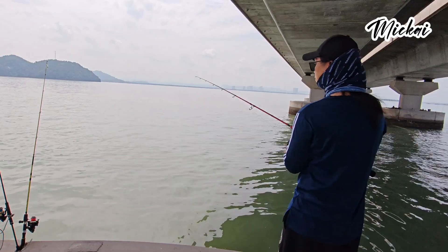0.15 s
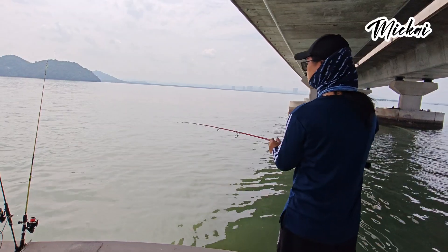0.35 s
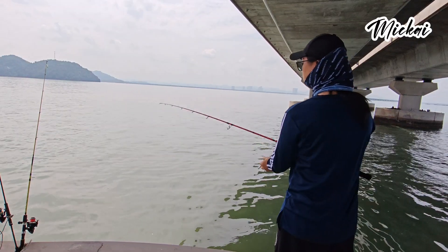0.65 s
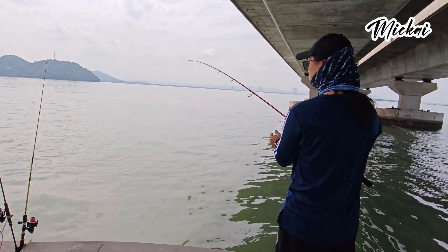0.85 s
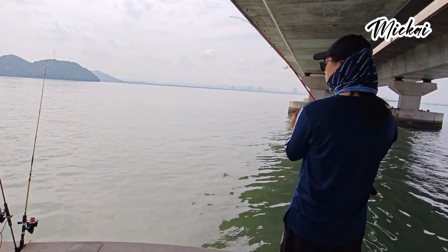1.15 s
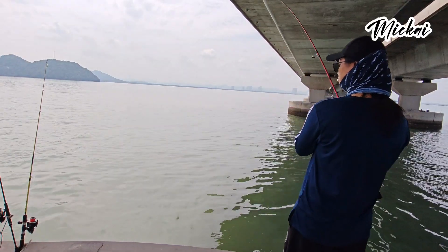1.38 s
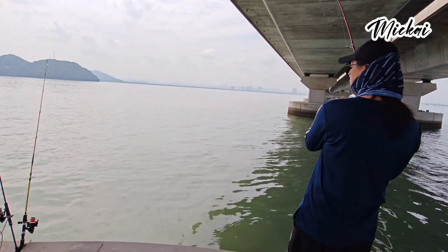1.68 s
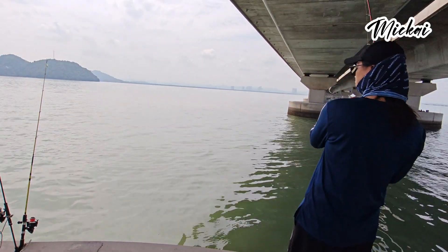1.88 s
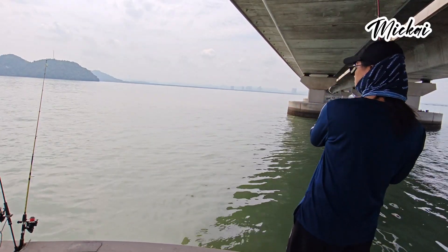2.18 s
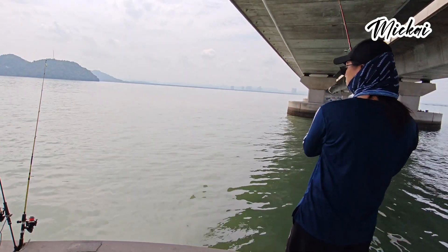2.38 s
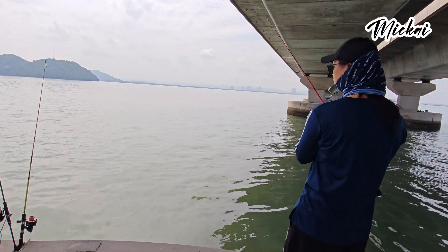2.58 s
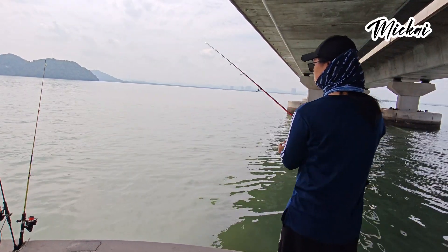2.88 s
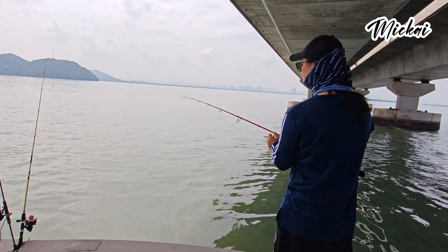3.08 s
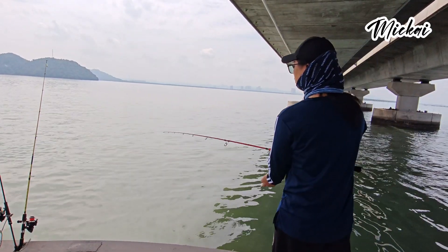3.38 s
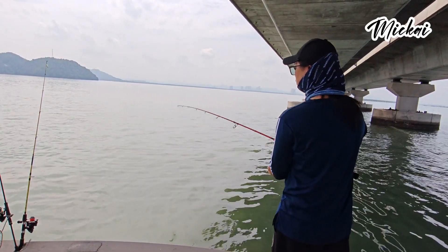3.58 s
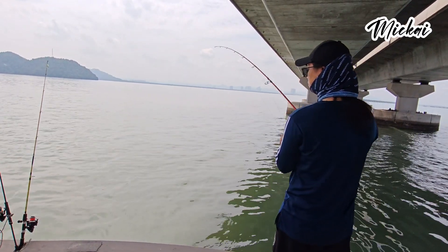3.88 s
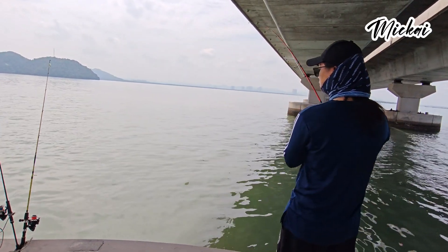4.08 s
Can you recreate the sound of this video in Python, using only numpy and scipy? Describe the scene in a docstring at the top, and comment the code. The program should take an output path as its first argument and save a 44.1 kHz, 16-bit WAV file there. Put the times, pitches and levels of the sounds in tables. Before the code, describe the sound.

Under a road bridge, low booming vehicle passes swell overhead as water hisses nearby, a reel is briefly cranked and tackle clicks.

```python
"""Traffic on a concrete road bridge over the sea, heard from below: noise bands shaken by axle loads, tyre roar
and tread noise swelling with each pass, sinking engine tones and briefly singing treads. Nearer: a fine high
hiss swells and fades, droplets ring, and an angler cranks a spinning reel in short spells (line, gear and rotor
noise); tackle clicks, faint squeaks and a steady hiss complete it."""
import sys
import numpy as np
from scipy import signal
from scipy.fft import rfft, irfft, next_fast_len
from scipy.io import wavfile
from scipy.ndimage import uniform_filter1d, map_coordinates

SR = 44100
rng = np.random.default_rng(int(sys.argv[2]) if len(sys.argv) > 2 else 0)


def to_wav(s):
    """Save 16-bit WAV."""
    ch = np.atleast_2d(s).T  # columns
    pcm = np.round(np.clip(ch, -1, 1) * 32767)  # PCM
    wavfile.write(sys.argv[1], SR, pcm.astype(np.int16))


N = 187204
TIME_S = np.arange(N) / SR

# Levels in the tables are ahead of filters and mix gains.
# Noise spectra: [f/Hz, relative level/dB]
# span, slab and hollow girder
SHUDDER_SPECTRUM = [(16, -33), (25, -15), (40, -8.5), (60, -3.5), (74, -2.5), (90, -21.5)]
RUMBLE_SPECTRUM = [(62, -22), (80, -11), (91, 11.5), (99, -6.5), (112, 6), (135, -6.5), (165, -28)]
BOOM_SPECTRUM = [(110, -20), (142, -1), (175, -1), (230, -2), (300, -6.5), (400, -22.5)]
# tyres: broad road roar, tread hump, bright edge: [f/Hz, relative level/dB]
ROAR_SPECTRUM = [(250, -23.5), (335, 2.5), (430, -1.5), (560, -4), (700, -4), (900, -15.5)]
TREAD_SPECTRUM = [(520, -17), (730, -8), (860, -1.5), (1080, 0), (1220, -0.5), (1400, -7.5), (1900, -22.5),
                  (2600, -23), (3400, -32.5), (5000, -37.5), (8000, -60)]
SIZZLE_SPECTRUM = [(1150, -22.5), (1400, 6), (1750, 2), (2200, -3), (2900, -10.5), (4000, -17.5)]
# swelling hiss at the left and right ports: [f/Hz, relative level/dB]
HISS_LEFT_SPECTRUM = [(1500, -9), (2500, 16.5), (3600, 3.5), (5200, -0.5), (6100, 7), (7100, 0),
                      (8000, 6.5), (8600, -1), (9300, -26.5), (11500, -29), (15500, -27.5)]
HISS_RIGHT_SPECTRUM = [(1500, -25), (2500, 14), (3600, -1), (5200, -5.5), (6100, 1), (7100, -9),
                       (8000, -31.5), (8600, -17), (9300, -39.5), (11500, -29), (15500, -42.5)]
# reel: line on roller, gears, rotor: [f/Hz, relative level/dB]
WHIRR_SPECTRUM = [(2500, -13), (5000, -1.5), (8000, 8), (9500, -2.5), (11200, -2), (11750, 2), (12400, -6),
                  (14000, -7.5), (15700, -10.5)]
GEAR_SPECTRUM = [(1900, -20), (2300, -3.0), (2650, 0.5), (2950, -1.5), (3400, -17.5), (4000, -34.5)]
ROTOR_SPECTRUM = [(4100, -12.5), (4600, -4), (4900, -7), (5200, -12.5), (5600, -15.0)]
# steady background hiss: [f/Hz, relative level/dB]
AIR_SPECTRUM = [(2000, 0), (9000, -1), (11500, 0.91), (16000, 0)]
# left-right likeness of the noises: [f/Hz, likeness/1]
PORT_LIKENESS = [(30, 0.89), (120, 0.99), (280, 0.98), (600, 0.95), (1000, 0.41), (2000, 0.23),
                 (4000, 0.13), (12000, 0.19)]

# shuddering of the span under heavy vehicles: [t/s, length/s, level/dB]
SPAN_SHAKES = [(.38, .03, -22), (0.635, 0.14, -15.5), (1.014, 0.022, -14.5), (1.62, .13, -18),
               (2.852, 0.097, -21), (3.315, .52, -18), (4.007, .11, -18)]
# axle thuds on the slab: [t/s, level/dB]
AXLE_THUDS = [(.09, -17), (.21, -24), (.71, -17), (1.06, -21), (1.18, -16), (1.3, -12), (1.46, -11),
              (1.63, -17), (1.747, -10.5), (2.05, -17.5), (2.28, -16), (2.41, -15.5), (2.72, -11),
              (2.88, -10.5), (3.07, -14), (3.25, -11), (3.52, -13), (3.9, -11), (4.11, -12)]
# girder boom under the traffic's weight: [t/s, level/dB]
GIRDER_LOAD = [(0.0, -26), (0.61, -19.5), (0.75, -15.5), (0.81, -23), (1.12, -18), (1.36, -22), (1.4, -16),
               (1.95, -18), (2.27, -15.5), (2.3, -23.5), (2.4, -17), (3.06, -18), (3.08, -23),
               (3.53, -14.5), (3.58, -25.5), (4.12, -19.5), (4.24, -23)]
# passes overhead: [t nearest/s, half-width/s, roar/dB, tread/dB, sizzle/dB]
PASSES = [(.72, 0.17, -23.5, -21, -37), (1.2, 0.61, -27.5, -25.5, -27), (2.15, 0.35, -29.5, -25.5, -32),
          (2.6, 0.2, -24.5, -20.5, -25), (3.03, 0.14, -23.5, -19, -28.5), (3.48, 0.36, -21.5, -17, -47.5)]
# nominal tread hump pitch: [t/s, f/Hz]
TREAD_PITCH_CURVE = [(0, 931), (.6, 863.4), (1.05, 1048), (2.2, 1065), (3.1, 1039), (3.85, 903.5),
                     (4.24, 965)]
# traffic's lead at the left microphone: [t/s, lead/s]
LEFT_LEAD = [(0, 0.00018), (.75, 0.00032), (1.5, 0.00016), (2.25, 0.00013), (3.25, 0.00025),
             (4.24, 0.00032)]
# engines, singing treads, thin squeaks: [t/s, length/s, f/Hz, sag/(Hz/s), level/dB]
ENGINE_TONES = [(2.01, .26, 182, 62, -17.5), (2.438, 0.21, 136.5, 32, -22), (2.716, 0.32, 109, 11, -20.5),
                (3.23, 0.97, 312, 28, -30.5)]
TREAD_TONES = [(1.87, 0.056, 1088, 201.3, -22), (2.22, .035, 1108, 100, -24.5)]
SQUEAK_TONES = [(.026, .02, 7300, 600, -60), (.068, .018, 7400, 600, -59)]
# hiss surges: [t/s, length/s, hiss/dB, rise/(dB/s), fall/(dB/s)]
HISS_SURGES = [(.02, 0.063, -53, 100, 130), (.56, 0.3, -33, 125, 28), (3.12, 0.57, -37, 13, 52),
               (4.12, 0.057, -44, 67, 43)]
# cranking spells: [t/s, length/s, whirr/dB, gears/dB, rotor/dB, throb/dB,
#                   slowing/(dB/s), growing pull/(dB/s)]
CRANK_SPELLS = [(0.565, 0.34, -38.5, -42.5, -55.5, 4, 25, 44), (2.53, 0.61, -63, -51, -58, -0.5, -11, 10),
                (3.117, 0.12, -45, -35.5, -44, 1.0, -20, 30), (3.305, 0.15, -45, -32, -39.5, 2, 20, 5),
                (3.57, .2, -50.5, -43, -49.5, 2.5, 16, 26)]
# tackle clicks: [t/s, level/dB, ring f/Hz]
TACKLE_CLICKS = [(3.128, -25, 5400), (3.209, -23, 6200), (4.082, -18, 5860), (4.0868, -18.5, 4140)]
# reflections off close surfaces: [delay/s, gain/1]
CLOSE_ECHOES = [(.00057, .17), (.0021, .14), (.0053, .16), (0.012, .16)]

SPAN_DB, SHAKE_RISE_DB_PER_S, SHAKE_FALL_DB_PER_S = -24.5, 221, 261
SLAB_DB, THUD_RISE_DB_PER_S, THUD_FALL_DB_PER_S = -22, 172.5, 256
THUD_IN_GIRDER_DB = -10   # share of each thud picked up by the girder
FAR_ROAR_DB, FAR_TREAD_DB, FAR_SIZZLE_DB = -35, -32, -44   # traffic further along the bridge
SHIELDING = 1.26   # exponent: deck edge makes a pass fade faster than distance alone
TREAD_HZ = 1037   # reference pitch for the hump's slide
CALM_HISS_DB = -58.5
CRANK_START_DB_PER_S, CRANK_STOP_DB_PER_S = 552, 64
GEAR_START_DB_PER_S, GEAR_STOP_DB_PER_S = 149.5, 91.5
FIRST_TURN_S = 0.0087   # spell start to the first throb peak
CUTOFF_HZ = 15800


def from_db(db):
    """Decibels to amplitude gain."""
    return 10 ** (np.asarray(db) / 20)


def rms_one(x):
    """Scale to unit power."""
    return x / np.sqrt(np.mean(x ** 2) + 1e-20)


def in_time(rows):
    """Interpolate a two-column curve at every sample."""
    t_s, value = np.transpose(rows)
    return np.interp(TIME_S, t_s, value)


def at_hz(points, hz):
    """Interpolate a table on a log-frequency axis."""
    table_hz, value = np.transpose(points)
    return np.interp(np.log(hz), np.log(table_hz), value)


def drift(corner_hz):
    """Slow random modulation of unit RMS: white noise through two equal poles."""
    step = 40   # samples per slow sample
    pole = np.exp(-2 * np.pi * corner_hz * step / SR)
    white = rng.standard_normal(N // step + 2002)
    slow = signal.lfilter([1], [1, -2 * pole, pole * pole], white)[2000:]   # drop settling
    return np.interp(np.arange(N) / step, np.arange(len(slow)), rms_one(slow))


def noise(spectrum, right_spectrum=None):
    """Coloured noise at two ports, alike in the bass and largely unrelated in the treble."""
    size = next_fast_len(N, True)
    hz = np.maximum(np.fft.rfftfreq(size, 1 / SR), 1)
    mid, side = rfft(rng.standard_normal((2, size)))
    alike = np.clip(at_hz(PORT_LIKENESS, hz), 0, 1)
    pair = np.sqrt(1 + alike) * mid + np.sqrt(1 - alike) * side * [[1], [-1]]
    low_hz, high_hz = spectrum[0][0], spectrum[-1][0]
    skirts = np.minimum(1, np.minimum(hz / low_hz, high_hz / hz)) ** 4
    colour = from_db([at_hz(spectrum, hz), at_hz(right_spectrum or spectrum, hz)])
    return rms_one(irfft(pair * colour * skirts, size)[:, :N])


def steady(x, span_s):
    """Divide out the short-term RMS so a separate envelope sets the level."""
    power = uniform_filter1d(np.mean(x ** 2, axis=0), max(int(span_s * SR), 2))
    return x / np.sqrt(power + 1e-9)


def pan(db):
    """Port gains; positive dB favours the left."""
    return from_db([[db / 2], [-db / 2]])


def envelope(start_s, length_s, rise_db_per_s, fall_db_per_s):
    """Attack, hold and release in dB relative to the held level."""
    early_s = np.maximum(start_s - TIME_S, 0)
    late_s = np.maximum(TIME_S - start_s - length_s, 0)
    return -abs(rise_db_per_s) * early_s - abs(fall_db_per_s) * late_s


def together(levels_db):
    """Level of unrelated sounds heard at once: powers add."""
    return 10 * np.log10(sum(from_db(db) ** 2 for db in levels_db) + 1e-20)


def tones(rows, edge_db_per_s, waver, flutter_db, drift_hz):
    """Wavering sines that swell, hold and fade while their pitch sinks."""
    out = 0
    for start_s, length_s, start_hz, sag_hz_per_s, level_db in rows:
        pitch_hz = start_hz - sag_hz_per_s * (TIME_S - start_s)
        phase = 2 * np.pi * np.cumsum(pitch_hz * (1 + waver * drift(drift_hz))) / SR
        swell_db = envelope(start_s, length_s, edge_db_per_s, edge_db_per_s)
        gain = from_db(level_db + swell_db + flutter_db * drift(drift_hz))
        out = out + np.sqrt(2) * np.sin(phase) * gain
    return out


def air():
    """Faint steady hiss: stationary broadband noise."""
    return from_db(-71.5) * noise(AIR_SPECTRUM)


def squeaks():
    """Faint thin squeaks: short high sines with falling pitch."""
    return from_db(0.5) * tones(SQUEAK_TONES, edge_db_per_s=500, waver=0.0029, flutter_db=6.0, drift_hz=60)


def droplets(per_s=90, smallest_db=-62.0, spread_db=4.5, ring_s=0.003):
    """Tiny bubbles burst at random times, each exciting a short high damped resonance."""
    out = np.zeros((2, N))
    pitches_hz = np.geomspace(5200, 8300, num=12)
    r = np.exp(-1 / (ring_s * SR))
    for hz in pitches_hz:
        born = rng.random(N) < per_s / len(pitches_hz) / SR
        sizes = from_db(smallest_db + spread_db * np.minimum(rng.exponential(1, N), 3))
        w = 2 * np.pi * hz / SR
        rings = signal.lfilter([0, np.sin(w)], [1, -2 * r * np.cos(w), r * r], born * sizes + 1e-18)
        out += rings * pan(rng.normal(4, 3))
    return out


def swelling_hiss():
    """A fine hiss swells and fades in surges, brighter on the left side."""
    surges_db = [db + envelope(s, length_s, rise, fall) for s, length_s, db, rise, fall in HISS_SURGES]
    hiss_db = together([CALM_HISS_DB] + surges_db)
    return from_db(hiss_db + 3.5 + 0.5 * drift(40)) * noise(HISS_LEFT_SPECTRUM, HISS_RIGHT_SPECTRUM)


def tackle(ring_s=0.0011, crack_db=0.0, crack_s=0.002):
    """Clicks: a noise crack plus a damped ring; small parts radiate little bass."""
    out = np.zeros((2, N))
    age_s = np.arange(SR // 50) / SR
    for s, level_db, ring_hz in TACKLE_CLICKS:
        crack = rng.standard_normal((2, len(age_s))) * np.exp(-age_s / crack_s)
        ring = np.sin(2 * np.pi * ring_hz * age_s) * np.exp(-age_s / ring_s)
        start = int(s * SR)
        out[:, start:start + len(age_s)] += from_db(level_db) * (ring + from_db(crack_db) * crack)
    thin = signal.sosfilt(signal.butter(6, 3500, "high", fs=SR, output="sos"), out)
    return signal.sosfilt(signal.butter(4, 8500, fs=SR, output="sos"), thin)


def cranking(turns_hz=15.0, settle_s=0.33):
    """Whirr, gears, rotor in dB: throb dies as cranking evens out; gears rasp more as the line pulls."""
    spells = []
    for row in CRANK_SPELLS:
        s, length_s, whirr_db, gears_db, rotor_db, throb_db, slowing_db_per_s, pull_db_per_s = row
        age_s = TIME_S - s
        wound_s = np.clip(age_s, 0, length_s)
        settling = np.exp(-(age_s / settle_s) ** 2)
        throb = throb_db * np.cos(2 * np.pi * turns_hz * (age_s - FIRST_TURN_S)) * settling
        line = envelope(s, length_s, CRANK_START_DB_PER_S, CRANK_STOP_DB_PER_S) - slowing_db_per_s * wound_s
        drive = envelope(s, length_s, GEAR_START_DB_PER_S, GEAR_STOP_DB_PER_S) + pull_db_per_s * wound_s
        spells.append([whirr_db + line + throb, gears_db + drive, rotor_db + drive])
    return together(spells)


def winding(whirr_db, patchy_db, pan_db):
    """Line rubs over the roller: noise whose bands flicker separately as the line shifts."""
    rub, rest = 0, noise(WHIRR_SPECTRUM)
    for edge_hz in np.linspace(6000, 14000, num=6):
        band = signal.sosfiltfilt(signal.butter(6, edge_hz, fs=SR, output="sos"), rest)
        rest = rest - band
        rub = rub + band * from_db(patchy_db * drift(20))
    return from_db(whirr_db + 1.2 * drift(70)) * (rub + rest) * pan(pan_db)


def reel():
    """Spells of line whirr over gear rasp and rotor hiss, each a noise band."""
    whirr_db, gears_db, rotor_db = cranking()
    gears = from_db(gears_db + 0.88 * drift(27)) * noise(GEAR_SPECTRUM)
    rotor = from_db(rotor_db + 2.0 * drift(30)) * noise(ROTOR_SPECTRUM)
    return winding(whirr_db, patchy_db=3.0, pan_db=6.0) + (gears + rotor) * pan(db=4.0)


def reflected(x):
    """Close surfaces add delayed copies that ripple the spectrum."""
    return x + sum(gain * np.roll(x, int(delay_s * SR), axis=1) for delay_s, gain in CLOSE_ECHOES)


def engines():
    """Engines drone past: wavering low sines, sinking in pitch."""
    return tones(ENGINE_TONES, edge_db_per_s=156.5, waver=0.0295, flutter_db=3.0, drift_hz=16.7)


def singing_treads():
    """Treads sing briefly: short sines near 1.1 kHz, sinking in pitch."""
    return tones(TREAD_TONES, edge_db_per_s=168, waver=0.0075, flutter_db=4.5, drift_hz=28)


def passing():
    """Roar, tread and sizzle in dB: each vehicle swells as it nears and fades as it leaves."""
    levels_db = [np.array([[FAR_ROAR_DB], [FAR_TREAD_DB], [FAR_SIZZLE_DB]])]
    for s, width_s, *peaks_db in PASSES:
        distance = np.hypot(1, (TIME_S - s) / width_s)   # 1 when nearest
        levels_db.append(np.array(peaks_db)[:, None] - SHIELDING * 20 * np.log10(distance))
    return together(levels_db)


def sizzle(sizzle_db):
    """Bright edge of tyre noise, strongest from the nearest stretch of road."""
    return from_db(sizzle_db + 1.0 * drift(15)) * noise(SIZZLE_SPECTRUM)


def tyres(roar_db, tread_db):
    """Broad road roar plus a tread hump near 1 kHz, slid in pitch by variable-rate resampling."""
    doppler = np.clip(in_time(TREAD_PITCH_CURVE) / TREAD_HZ, 0.6, 1.5) ** 0.8   # softened slide
    place = np.cumsum(doppler)
    tread = np.array([map_coordinates(port, [place], order=3, mode="mirror")
                      for port in noise(TREAD_SPECTRUM)])
    return from_db(roar_db) * noise(ROAR_SPECTRUM) + from_db(tread_db + 3.0) * tread * pan(db=1.0)


def deck():
    """Axles shake the span, slab and hollow girder, each a noise band with its own load envelope."""
    shakes_db = [db + envelope(s, length_s, SHAKE_RISE_DB_PER_S, SHAKE_FALL_DB_PER_S)
                 for s, length_s, db in SPAN_SHAKES]
    thuds_db = [db + envelope(s, 0, THUD_RISE_DB_PER_S, THUD_FALL_DB_PER_S) for s, db in AXLE_THUDS]
    shudder_db = together(shakes_db + [SPAN_DB + 1.7 * drift(12)])
    rumble_db = together(thuds_db + [SLAB_DB + 1.1 * drift(5.1)])
    boom_db = together([in_time(GIRDER_LOAD), together(thuds_db) + THUD_IN_GIRDER_DB])
    span = from_db(shudder_db) * steady(noise(SHUDDER_SPECTRUM), span_s=0.14) * pan(db=1.5)
    slab = from_db(rumble_db) * steady(noise(RUMBLE_SPECTRUM), span_s=0.075) * pan(db=0.5)
    girder = from_db(boom_db) * steady(noise(BOOM_SPECTRUM), span_s=0.19) * pan(db=-0.2)
    return span + slab + from_db(-0.3) * girder


def traffic():
    """All bridge sound, reaching the left microphone slightly before the right."""
    roar_db, tread_db, sizzle_db = passing()
    left, right = deck() + tyres(roar_db, tread_db) + sizzle(sizzle_db) + engines() + singing_treads()
    right_place = (TIME_S - in_time(LEFT_LEAD)) * SR
    return np.array([left, map_coordinates(right, [right_place], order=3, mode="mirror")])


def scene():
    """Faint hiss, a swelling hiss, reel and tackle close by, traffic overhead."""
    close = reflected(swelling_hiss() + reel()) + droplets() + tackle() + squeaks()
    return air() + from_db(-0.5) * close + traffic()


def record(dry):
    """Round peaks softly towards full scale, then low-pass steeply."""
    rounded = dry / (1 + dry ** 8) ** (1 / 8)
    return signal.sosfilt(signal.ellip(12, 0.1, 90, CUTOFF_HZ, fs=SR, output="sos"), rounded)


dry = scene()
out = record(dry)
to_wav(out)
```